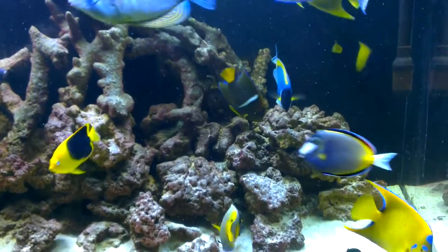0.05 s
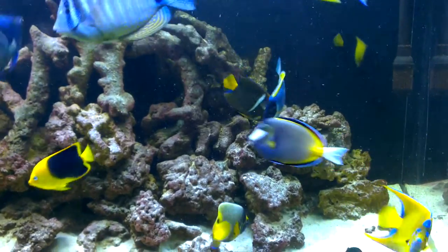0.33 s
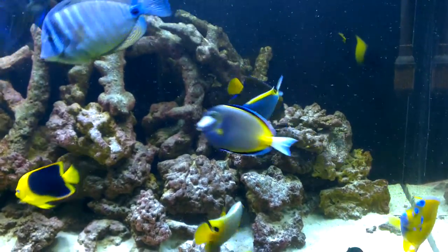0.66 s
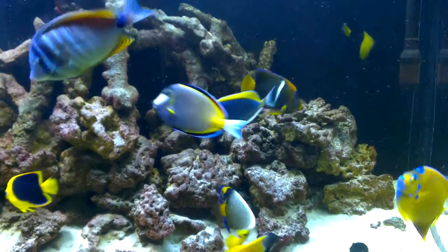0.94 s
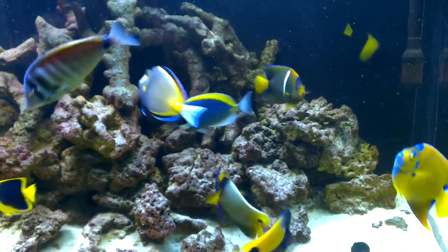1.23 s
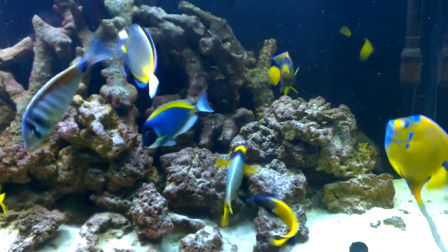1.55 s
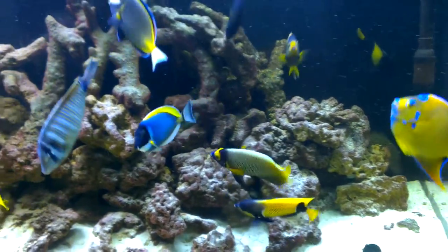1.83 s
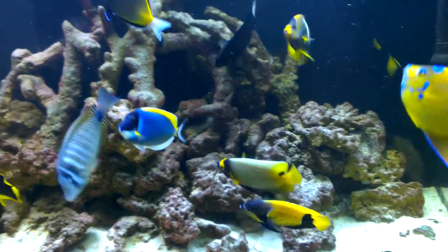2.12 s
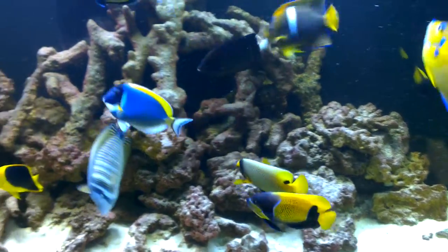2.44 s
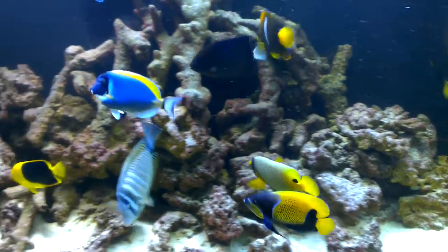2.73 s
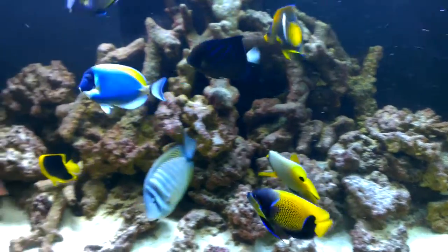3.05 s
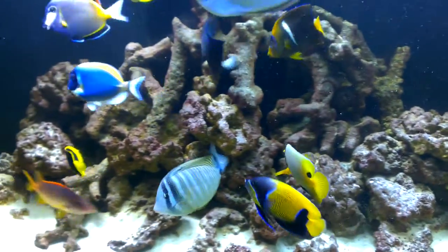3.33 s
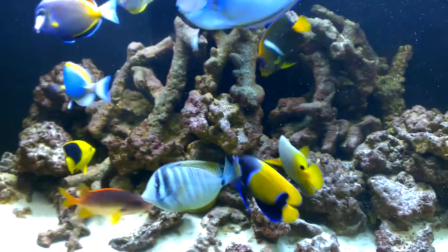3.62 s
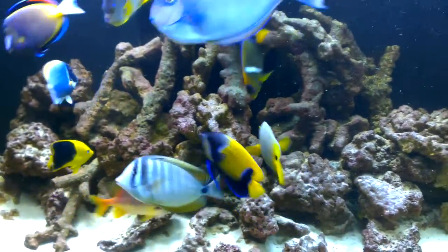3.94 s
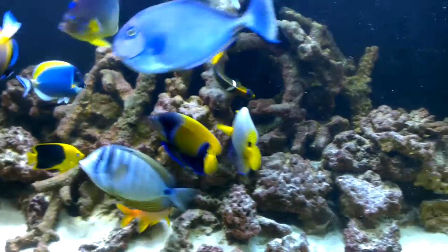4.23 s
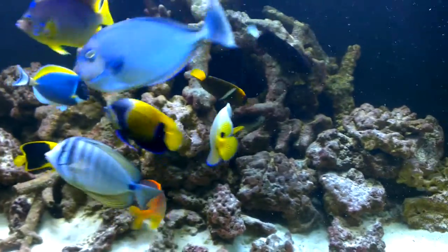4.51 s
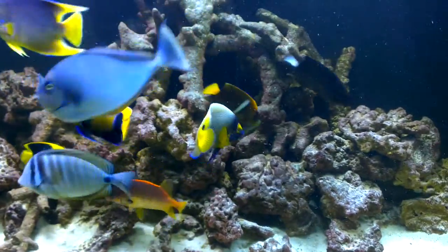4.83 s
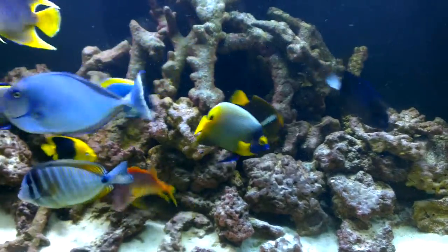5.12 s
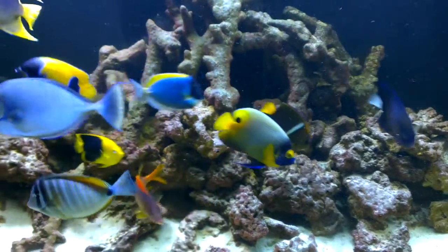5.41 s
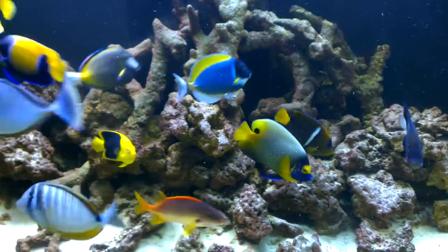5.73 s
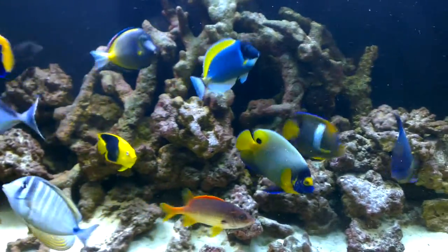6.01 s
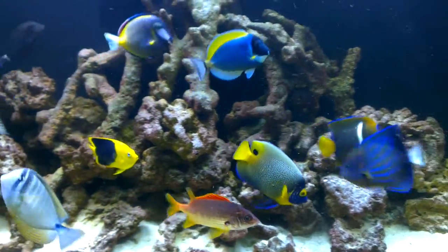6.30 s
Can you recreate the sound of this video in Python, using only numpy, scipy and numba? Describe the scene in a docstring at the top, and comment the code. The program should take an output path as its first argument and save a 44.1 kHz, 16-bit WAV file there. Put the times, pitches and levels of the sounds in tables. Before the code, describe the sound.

Water gurgles, trickles and fizzes through an aquarium filter, with small splashes over a faint pump hum.

```python
"""Water runs through the filter of a large home aquarium in a living room.
Its sound is made of bubbles, each ringing briefly: big ones gurgle in the overflow, small ones
trickle in the falling stream, and tiny ones spray and fizz, swelling with each surge.
Gulps of water splash down, and now and then the standpipe (the upright drain) glugs.
Two pumps hum underneath, and one impeller (a pump's spinning wheel) buzzes faintly."""
import sys
import numpy as np
from scipy import signal
from scipy.fft import rfft, irfft
from scipy.io import wavfile
from numba import njit

SR = 44100
rng = np.random.default_rng(int(sys.argv[2]) if len(sys.argv) > 2 else 0)


def int16_out(signal):
    """Quantize to a 16-bit WAV file."""
    q = np.round(np.clip(np.atleast_2d(signal).T, -1, 1) * 32767)
    wavfile.write(sys.argv[1], SR, q.astype(np.int16))


N = 289296

# How strong the water's sound is from low to high: pitch_hz, level_db
WATER_TONE = [(110, -47), (200, -19.5), (270, -12.5), (350, -5), (570, -7), (680, -2), (900, -1.1),
              (1250, -3.5), (1550, -6.5), (2050, -8), (2550, -5), (3250, -4.5), (4600, -5.5), (7000, -4),
              (8200, -7), (8600, -6.5), (10000, -8.5), (13000, -19.5), (15500, -29)]


def from_db(db):
    """Turn decibels into a number to multiply by."""
    return 10 ** (np.asarray(db) / 20)


def rms_one(x):
    """Scale a pair of mid (what both ears share) and side (how they differ) so mid has strength 1."""
    return x / np.sqrt(np.mean(x[0] ** 2) + 1e-20)


def in_time(points):
    """Join (time_s, value) points with straight lines, giving a value for every sample."""
    time_s, values = np.transpose(points)
    return np.interp(np.arange(N) / SR, time_s, values)


def bin_hz():
    """All the pitches that a full-length sound splits into."""
    return np.maximum(np.arange(N // 2 + 1) * SR / N, 1)


def gain_curve(points):
    """Join (pitch_hz, level_db) points, giving a gain for every pitch."""
    hz, db = np.transpose(points)
    return from_db(np.interp(np.log(bin_hz()), np.log(hz), db))


def filtered(x, gain):
    """Turn each pitch up or down by its own gain."""
    return irfft(rfft(x) * gain, N)


def drift(rate_hz):
    """A smooth random wobble, typically of size 1."""
    slow = filtered(rng.standard_normal(N), 1 / (1 + (bin_hz() / rate_hz) ** 2))
    return slow / slow.std()


def panned(x, left_db):
    """Lean a (mid, side) pair to the left; negative values lean it right."""
    share = np.tanh(np.log(from_db(left_db)) / 2)
    return (x + share * x[::-1]) / np.hypot(1, share)


@njit
def ring_bubbles(start, hz, strength, place, cycles, rise):
    """Each bubble is a fading tone whose pitch climbs as it nears the surface; gives (mid, side)."""
    out = np.zeros((2, N))
    for k in range(len(start)):
        life = cycles / hz[k] * SR
        fade = np.exp(-np.log(1000) / life)   # 60 dB quieter by the end of its life
        height, phase = strength[k], 0.0
        for i in range(min(int(life), N - start[k])):
            phase += 2 * np.pi * hz[k] / SR * (1 + rise * i / life)
            height *= fade
            value = height * np.sin(phase)
            out[0, start[k] + i] += value
            out[1, start[k] + i] += value * place[k]
    return out


def peak_gain():
    """A row of narrow treble peaks colours the water's sound."""
    # High pitches that stand out: pitch_hz, width_hz, level_db
    treble_peaks = [(2950, 310, -8), (3416, 370, -4.5), (3980, 160, -14), (5725, 43, 0), (6100, 100, -18),
                    (6340, 100, -8), (7000, 130, -11.5), (7350, 81, -4.5), (8000, 98, -8)]
    return 1 + sum(from_db(db) / (1 + (2 * (bin_hz() - hz) / width) ** 2)
                   for hz, width, db in treble_peaks)


def swarm(low_hz, high_hz, cycles, spread_db, rise, count):
    """Bubbles born at random moments and places, given the water's tone and its treble peaks."""
    when, pitch, size, place = rng.random((count, 4)).T
    start = (when * N).astype(np.int64)
    hz = low_hz + (high_hz - low_hz) * pitch
    uneven_db = spread_db * np.minimum(-np.log(1 - size), 5)
    strength = np.sqrt(hz) * from_db(uneven_db) * rng.choice([-1, 1], count)
    rings = ring_bubbles(start, hz, strength, np.sqrt(3) * (2 * place - 1), cycles, rise)
    return rms_one(filtered(rings, gain_curve(WATER_TONE) * peak_gain()))


def cloud(start_s, level_db, hz, octaves, length_s, cycles, spread_db, rise, count):
    """Bubbles of similar size are trapped together; the cloud thins out quickly."""
    pitch, size, place = rng.standard_normal((count, 3)).T
    delay_s = rng.gamma(2, 1, count) * length_s / 2
    start = ((start_s + delay_s) * SR).astype(np.int64)
    strength = from_db(spread_db * size) * rng.choice([-1, 1], count)
    rings = ring_bubbles(start, hz * 2 ** (octaves * pitch), strength, place, cycles, rise)
    return from_db(level_db) * rms_one(rings) * np.sqrt(length_s * SR / N)


def overflow():
    """Big, low bubbles churn steadily in the drain."""
    # Loudness of the gurgle: time_s, level_db
    gurgle_levels = [(0, -46), (1.2, -46), (2.2, -45.6), (3.6, -45.5), (4.9, -45.5), (5.25, -46),
                     (6.56, -45.8)]
    churn = swarm(low_hz=226.6, high_hz=2350, cycles=28.6, spread_db=0.44, rise=0.041, count=34000)
    return from_db(in_time(gurgle_levels) + 0.33 * drift(rate_hz=18)) * churn


def spray_level(swell_s=0.016, fade_s=0.038, sag_db_per_s=10):
    """The spray's level in dB: on top of the steady flow, each surge swells, sputters and dies away."""
    # Spray from the steady flow: time_s, level_db
    flow_levels = [(0, -45.5), (.45, -43.5), (.65, -46), (.9, -43), (1.5, -43), (1.85, -42), (2.4, -39.5),
                   (2.85, -44), (3.25, -43.5), (3.75, -42.5), (4.0, -45.5), (4.22, -44), (4.65, -41.5),
                   (4.9, -42.5), (5.25, -41.5), (5.6, -43.5), (5.8, -43), (6.15, -43), (6.33, -45),
                   (6.56, -41)]
    # Surges, when extra water spills over: start_s, length_s, level_db
    surges = [(0.344, .04, -43), (.928, 0.18, -40), (1.11, 0.19, -41.5), (1.314, 0.12, -39.5),
              (1.45, 0.08, -41.5), (1.942, 0.35, -37), (2.433, 0.12, -42), (2.587, 0.13, -44.5),
              (3.35, 0.15, -40.5), (3.538, 0.1, -37.5), (3.645, 0.03, -45), (3.798, 0.042, -40),
              (4.35, 0.06, -42), (4.783, 0.074, -40.5), (4.928, 0.048, -41), (4.984, 0.045, -38.5),
              (5.157, 0.094, -48), (5.298, 0.12, -38), (5.421, 0.078, -39.5), (5.647, 0.075, -42),
              (5.88, 0.037, -48), (6.005, .025, -46), (6.462, 0.039, -38.5)]
    t = np.arange(N) / SR
    power = from_db(in_time(flow_levels)) ** 2
    sputter_db = 0.2 * drift(rate_hz=14)
    for start_s, length_s, level_db in surges:
        age = np.maximum(t - start_s, 0)
        shape = np.minimum(age / swell_s, 1) * np.exp(-np.maximum(age - length_s, 0) / fade_s)
        power += (from_db(level_db + sputter_db - sag_db_per_s * age) * shape) ** 2
    return 10 * np.log10(power)


def stream(usual_spray_db=-42, flutter_hz=26):
    """Falling water: small bubbles trickle, and tiny ones spray and fizz more when it surges."""
    # Loudness of the trickle between surges: time_s, level_db
    trickle_levels = [(0, -42.5), (.7, -42.5), (1.45, -42), (2.1, -41), (3.0, -42), (3.5, -41.5),
                      (4.2, -42.5), (4.7, -41), (5.2, -43), (5.9, -41.5), (6.56, -42)]
    spray_db = spray_level()
    swell_db = spray_db - usual_spray_db
    trickle = swarm(low_hz=2345, high_hz=4307, cycles=37.4, spread_db=1.0, rise=0.05, count=32000)
    spray = swarm(low_hz=4365, high_hz=8410, cycles=25.6, spread_db=-0.06, rise=0.018, count=60000)
    fizz = swarm(low_hz=8600, high_hz=14600, cycles=10.4, spread_db=0.5, rise=0.02, count=70000)
    left_db = -0.3 * swell_db   # surges spill over further to the right
    spray = panned(spray, left_db)
    trickle = panned(trickle, left_db + drift(rate_hz=4.6))   # it also sways from side to side
    trickle_db = in_time(trickle_levels) + 0.083 * swell_db + 0.5 * drift(flutter_hz)
    spray_db += 0.85 * drift(flutter_hz)
    fizz_db = -52 + 0.82 * swell_db - 0.05 * drift(flutter_hz)
    return from_db(trickle_db) * trickle + from_db(spray_db) * spray + from_db(fizz_db) * fizz


def impeller(turns_per_s=60.03, rattle_s=0.007, low_hz=1100, high_hz=5930, level_db=-52.5):
    """The impeller knocks once a turn and rattles its housing: a thin, steady buzz."""
    whole_turns = np.floor(np.arange(N) / SR * turns_per_s)
    knocks = np.diff(whole_turns, prepend=0) * from_db(2 * drift(rate_hz=7))
    t = np.arange(SR // 20) / SR
    rattle = rng.standard_normal((2, len(t))) * np.exp(-t / rattle_s)
    buzz = signal.fftconvolve(knocks[None], rattle, axes=1)[:, :N]
    band = bin_hz() / (bin_hz() + low_hz) / (1 + (bin_hz() / high_hz) ** 4)
    return from_db(level_db) * rms_one(filtered(buzz, gain_curve(WATER_TONE) * band))


def pumps(waver_db=1.15):
    """Two motors hum, wavering a little with the load."""
    # Tones of motors turning about 60 and 53.3 times a second: pitch_hz, level_db
    hum_tones = [(120, -102), (180, -91), (213.3, -85), (266.4, -71), (320, -60.8), (360, -63.3),
                 (540, -66.5), (720.5, -61), (852.6, -61), (968.7, -62.3), (1261, -65.5), (2400, -63.5),
                 (2967.8, -59), (3902.7, -63.5), (4020.7, -63.5), (4684.5, -66)]
    t, out = np.arange(N) / SR, np.zeros((2, N))
    load = from_db(waver_db * drift(rate_hz=3.8))
    slip = 0.41 * drift(rate_hz=2)   # the tones run slightly ahead or behind
    for hz, level_db in hum_tones:
        phase = 2 * np.pi * (hz * t + rng.random((2, 1))) + slip * hz / 700
        out += np.sqrt(2) * from_db(level_db - 1) * np.sin(phase)
    return out * load


def rumble(level_db=-91.5):
    """The room's own very faint, low noise."""
    # Tone of the rumble: pitch_hz, level_db
    rumble_tone = [(20, -5), (55, 0), (85, 1), (130, 4), (200, 6), (400, -20)]
    return from_db(level_db) * rms_one(filtered(rng.standard_normal((2, N)), gain_curve(rumble_tone)))


def splashes():
    """Each gulp of water traps a cloud of small bubbles where it lands."""
    # Gulps landing: start_s, level_db, pitch_hz, spread_octaves, length_s, left_minus_right_db
    gulps = [(0.505, -36, 3350, .2, .015, -6), (.761, -36, 3400, .2, .012, -2),
             (.86, -40, 2480, .06, 0.029, 0), (0.94, -39.5, 3400, 0.23, 0.016, -5),
             (1.03, -36, 7200, 0.15, .015, -2), (1.231, -33, 5600, 0.25, 0.01, -5),
             (1.727, -33.5, 3620, .04, 0.015, -5), (1.86, -36, 3830, 0.2, .012, -6),
             (2.017, -39, 3380, 0.12, .026, 0), (2.088, -37, 6400, .3, 0.013, -4),
             (2.232, -28, 5230, 0.31, 0.01, -1), (2.593, -32.5, 3230, 0.2, .016, 0),
             (2.695, -35, 3300, 0.17, 0.017, 6), (2.892, -43, 9800, .073, .016, 2),
             (2.906, -33.5, 3250, 0.16, .012, 0), (2.991, -32.5, 3400, 0.18, .016, 0),
             (3.055, -31.5, 1620, 0.34, 0.035, -2), (3.056, -32, 3130, .19, 0.021, 2),
             (3.198, -40, 7500, 0.37, .024, 2), (3.323, -34, 3200, 0.1, .023, -2),
             (3.377, -27.5, 7260, .24, 0.024, 1), (3.383, -36.5, 3450, .18, .019, -8),
             (3.446, -35, 9900, .11, 0.028, 2), (3.488, -29.5, 6240, .32, 0.0097, -3),
             (3.539, -30, 5600, 0.4, .014, 4), (3.56, -30, 3400, 0.22, .014, -3),
             (3.576, -41, 1160, 0.26, .055, 0), (3.672, -34, 6400, .25, 0.01, -2),
             (3.701, -35, 3160, 0.096, 0.023, 0), (3.756, -36, 3300, 0.17, .015, 4),
             (3.817, -33.5, 3450, 0.15, 0.045, 10), (3.824, -36.5, 1900, 0.43, 0.02, -3),
             (4.282, -35, 3130, 0.098, 0.014, -2), (4.309, -33, 3260, .13, .02, -4),
             (4.369, -33.5, 3500, .15, 0.022, -4), (4.39, -34, 6360, 0.29, .016, -2),
             (4.539, -34, 2880, 0.08, .03, -2), (4.54, -31, 6100, .33, .01, -4),
             (4.682, -38, 3330, .2, 0.02, -1), (4.784, -33, 7900, .24, 0.018, 0),
             (4.943, -31.5, 4050, .12, .03, -3), (4.994, -30.5, 4300, 0.37, 0.026, -6),
             (5, -37, 4170, .05, .02, -4), (4.994, -42, 1800, 0.33, .03, 2),
             (5.338, -29, 3200, .11, .02, -1), (5.335, -34, 6200, .28, 0.017, -1),
             (5.373, -32.5, 3220, 0.089, 0.027, -4), (5.343, -46, 1920, .23, .024, -2),
             (5.445, -38, 6440, .25, .024, -6), (5.67, -32.5, 3220, 0.16, 0.032, -7),
             (5.682, -43, 1720, 0.44, .025, -2), (5.671, -38, 6500, .25, 0.034, -4),
             (5.8, -33, 3540, 0.23, 0.03, -7), (6.006, -38, 3260, 0.2, 0.021, 1),
             (6.078, -32, 3300, 0.22, 0.012, 4), (6.14, -35, 3400, .23, .016, 3),
             (6.22, -31, 3260, 0.18, 0.021, -6), (6.471, -36, 3800, .25, .014, -6),
             (6.474, -36, 7200, 0.14, .02, -6)]
    out = sum(panned(cloud(*gulp, cycles=28.0, spread_db=0.5, rise=0.023, count=260), left_db)
              for *gulp, left_db in gulps)
    out = filtered(out, peak_gain() / peak_gain().max())
    return signal.sosfilt(signal.butter(4, [600, 11500], "band", fs=SR, output="sos"), out + 1e-18)


def glugs(spread_octaves=0.03):
    """The standpipe swallows air, and a few longer-lasting bubbles ring inside it."""
    # Swallows of air: start_s, level_db, pitch_hz, length_s
    swallows = [(1.785, -43.5, 800, .024), (2.597, -46.5, 747, .034), (3.775, -45, 890, .011),
                (4.001, -45, 830, .027), (4.477, -43.5, 875, .022), (5.37, -45, 776, 0.028),
                (5.809, -49, 860, 0.022)]
    out = sum(cloud(start_s, db, hz, spread_octaves, length_s,
                    cycles=75.0, spread_db=3.0, rise=0.028, count=8)
              for start_s, db, hz, length_s in swallows)
    return signal.sosfilt(signal.butter(4, [550, 1300], "band", fs=SR, output="sos"), out + 1e-18)


def room(x, echo_s=0.19, echo_db=-2.5):
    """Echoes from glass, cabinet and walls blend; low notes escape and high ones are soaked up."""
    t = np.arange(SR // 3) / SR
    tails = rng.standard_normal((2, 2, len(t))) * from_db(-60 * t / echo_s) * (t > 0.002)
    tails /= np.sqrt(np.sum(tails ** 2, axis=(1, 2), keepdims=True))
    echoes = signal.fftconvolve(x[None], tails, axes=2)[..., :N].sum(axis=1)
    echo_gain = from_db(echo_db) / (1 + (1100 / bin_hz()) ** 2) / (1 + (bin_hz() / 7500) ** 4)
    return filtered(x + filtered(echoes, echo_gain), 1 / np.sqrt(1 + echo_gain ** 2))   # same power


def to_stereo(x, echo_share=0.54, lag_s=0.002017):
    """Turn (mid, side) into (left, right); a quick repeat of the side widens the sound."""
    # How wide each pitch sounds: pitch_hz, side_gain_db
    widths = [(60, -19), (130, -4), (300, -15), (600, -8), (1000, -6.5), (1600, -0.5), (3000, -2.5),
              (6000, -2.5), (14000, -2)]
    # Which way each pitch leans: pitch_hz, left_minus_right_db
    leans = [(300, -0.5), (2500, 0), (3300, -1), (4300, -3.5), (7000, -6), (8700, -1), (10500, 5),
             (15000, 0)]
    mid, side = x
    echo = (1 + echo_share * np.exp(-2j * np.pi * bin_hz() * lag_s)) / np.hypot(1, echo_share)
    side = filtered(side, gain_curve(widths) * echo)
    lean = gain_curve(leans)
    ear_gains = 2 * np.array([lean, np.ones_like(lean)]) / (1 + lean)
    return filtered(np.array([mid + side, mid - side]), ear_gains)


def scene():
    """Water echoes in the room, over the pumps and a faint rumble."""
    water = overflow() + glugs() + stream() + splashes()
    return to_stereo(room(water) + impeller() + pumps() + rumble())


def record(dry):
    """The very highest pitches are cut off steeply."""
    cutoff_hz = 15300
    return filtered(dry, 1 / np.sqrt(1 + (bin_hz() / cutoff_hz) ** 160))


dry = scene()
out = record(dry)
int16_out(out)
```